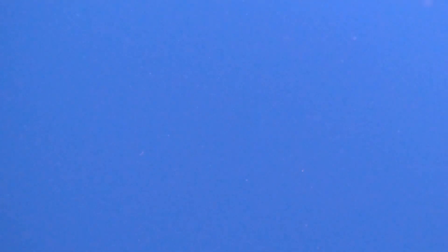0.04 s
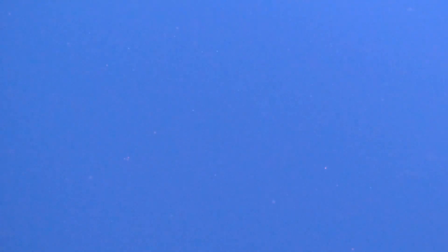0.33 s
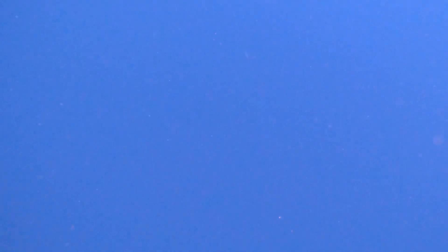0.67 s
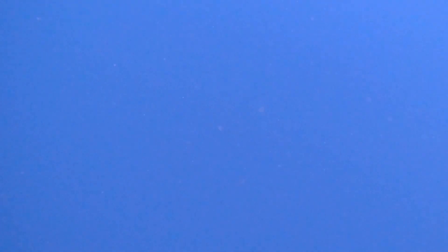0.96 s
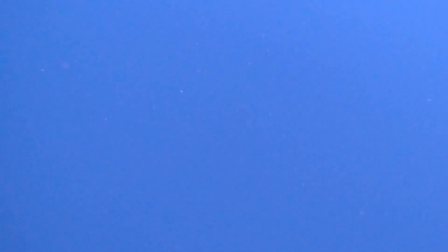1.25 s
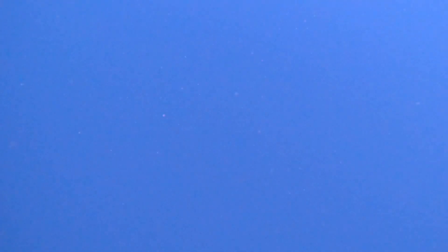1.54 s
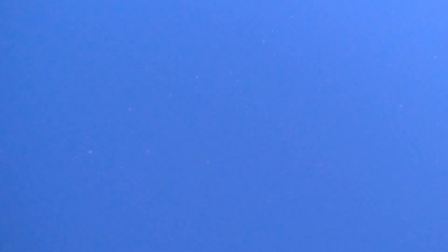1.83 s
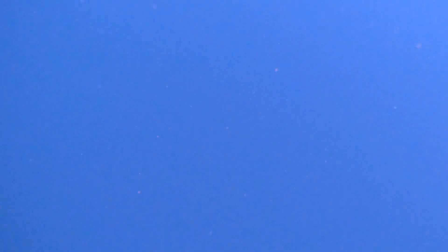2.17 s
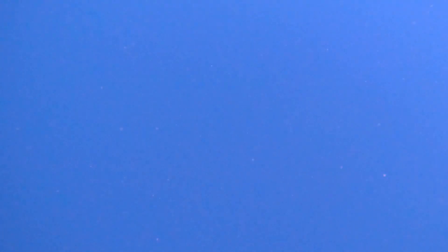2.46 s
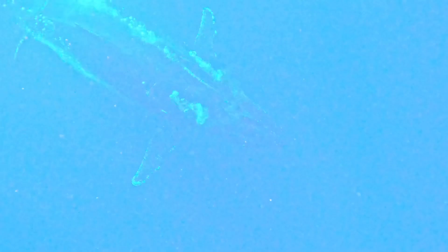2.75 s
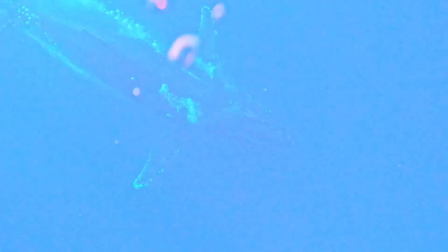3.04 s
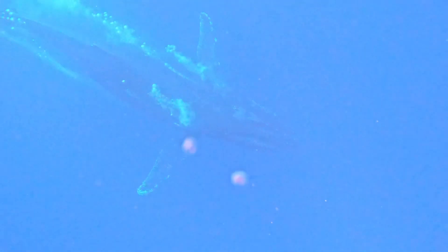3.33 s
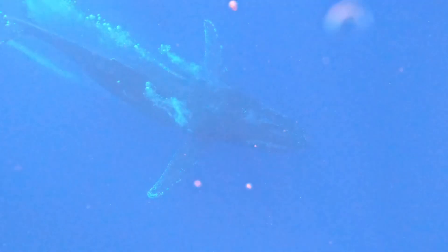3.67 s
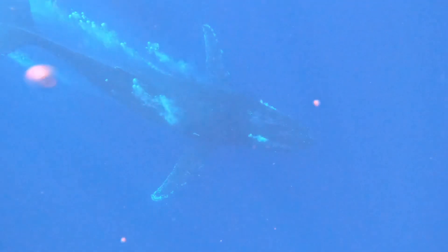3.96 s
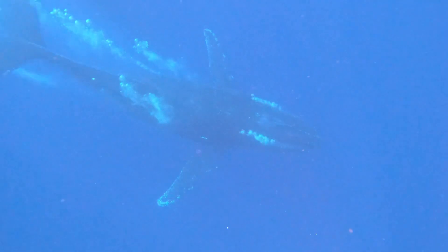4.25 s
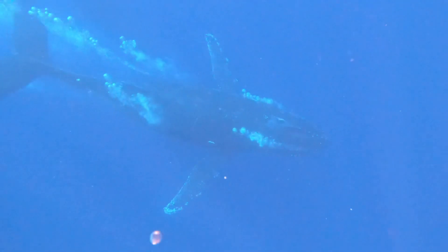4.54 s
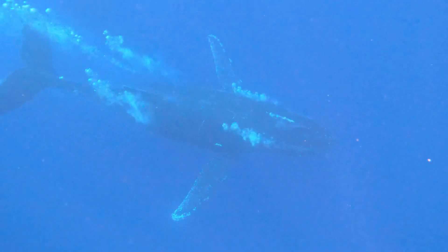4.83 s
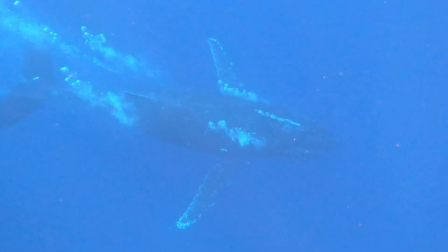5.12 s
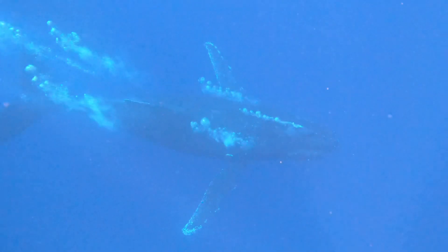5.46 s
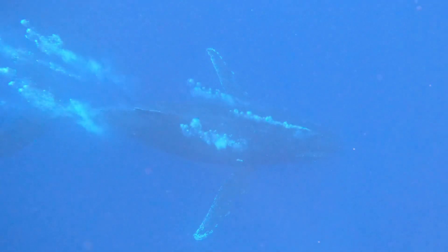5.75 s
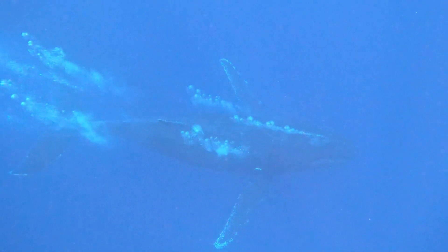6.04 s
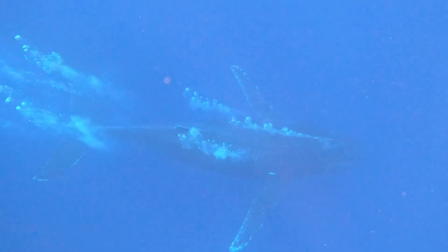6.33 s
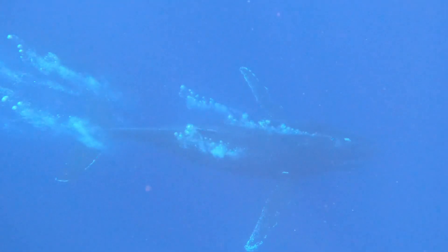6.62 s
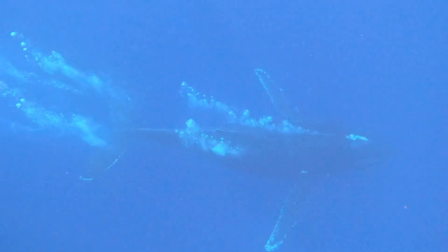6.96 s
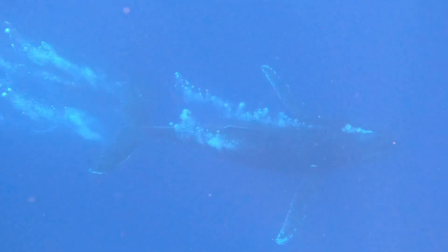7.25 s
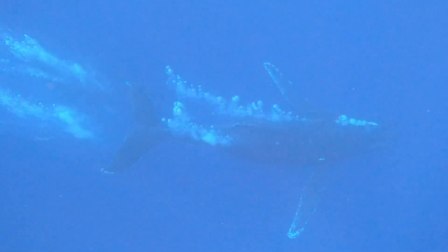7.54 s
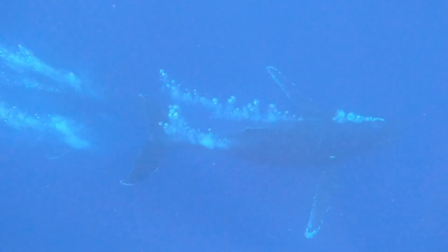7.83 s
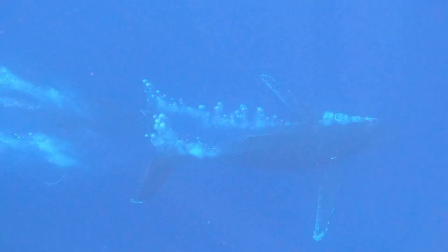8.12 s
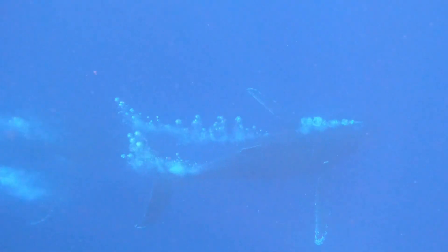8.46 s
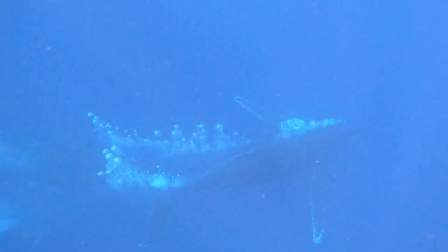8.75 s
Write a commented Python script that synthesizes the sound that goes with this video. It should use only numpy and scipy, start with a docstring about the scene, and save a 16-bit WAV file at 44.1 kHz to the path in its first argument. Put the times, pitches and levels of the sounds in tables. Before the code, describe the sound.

A low underwater rumble runs throughout, with a soft sea hiss at first. In the first 2.3 seconds a few dull bumps hit the camera housing, with a hard tap at 0.7 seconds and a faint high crackle of tiny bubbles just after 1 second. From about 1.4 to 2.6 seconds a whale gives one low, slightly raspy moan that climbs in scoops, holds and sinks. At 2.75 seconds the sound drops out for an instant and the hiss is gone. Small, sharp splashes follow around 3.1 seconds, and water begins churning close by around a swimmer, building until about 6 seconds. Large bubbles gulp and gurgle, and from 5 seconds small ones pinch off with short, high pops. One deep burble swells near 6.2 seconds. The churning continues, with its loudest gulps around 8 seconds, until the end at about 9 seconds.

```python
"""A whale's moan and churning water

In the open sea a whale gives one rising moan, a pulse train shaped by its airways, over a low rumble
and a soft hiss. A few bumps and a tap reach the camera housing. The sound drops out briefly; then
water churns round a swimmer. Each bubble rings as a spring of air loaded by the mass of the water:
a cloud of large ones gurgles, and small ones pinch off with short pops."""
import sys
import numpy as np
from scipy import signal
from scipy.fft import rfft, irfft, next_fast_len
from scipy.io import wavfile
from scipy.ndimage import uniform_filter1d

SR = 44100
rng = np.random.default_rng(int(sys.argv[2]) if len(sys.argv) > 2 else 0)


def transcribe(signal):
    """Save signal, clipped to [-1, 1], as a 16-bit WAV file at the path in sys.argv[1]."""
    frames = np.atleast_2d(signal).T
    limited = np.clip(frames, -1, 1)
    pcm = np.round(limited * 32767).astype(np.int16)
    wavfile.write(sys.argv[1], SR, pcm)


N = 396459
TIME = np.arange(N) / SR
CUT_S, RESUME_S = 2.752, 2.85  # the deepest stretch of the dropout


def amp(db):
    """Decibels to amplitude ratio."""
    return 10 ** (np.asarray(db) / 20)


def unit(x):
    """Normalisation to rms 1."""
    return x / np.sqrt(np.mean(x ** 2) + 1e-20)


def curves(rows):
    """Linear interpolation of each column of a time table, at every sample."""
    s, *columns = np.transpose(rows)
    return [np.interp(TIME, s, c) for c in columns]


def colour(points, hz):
    """Gain of a spectral envelope, interpolated in log frequency."""
    f, db = np.transpose(points)
    return amp(np.interp(np.log(hz + 1), np.log(f + 1), db))


def tint(x, points):
    """Spectral shaping with steep skirts; white noise keeps its power."""
    size = next_fast_len(N)
    hz = np.fft.rfftfreq(size, 1 / SR)
    skirts = np.minimum(1, hz / points[0][0]) ** 2 / np.maximum(1, hz / points[-1][0]) ** 6
    return irfft(rfft(x, size) * unit(colour(points, hz) * skirts), size)[..., :N]


def noise(points):
    """Gaussian noise with the given spectral envelope."""
    return tint(rng.standard_normal(N), points)


def drift(rate_hz):
    """Random modulation: low-passed noise of rms 1."""
    hz = np.fft.rfftfreq(N, 1 / SR)
    return unit(irfft(rfft(rng.standard_normal(N)) * np.exp(-(hz / rate_hz) ** 2), N))


def add(mix, s, sound):
    """Superposition of a sound that starts at time s."""
    part = mix[max(round(s * SR), 0):][:len(sound)]
    part += sound[:len(part)]


def scatter(x, t60):
    """Reverberation: many weak reflections form an exponentially decaying tail."""
    t = np.arange(SR // 2) / SR
    tail = rng.standard_normal(len(t)) * amp(-60 * t / t60)
    return signal.oaconvolve(x, tail / np.linalg.norm(tail))[:N]


# Envelopes of the flow on the housing and of the distant sea: (time [s], relative level [dB])
RUMBLE_ENVELOPE = [(0.0, -33.5), (0.65, -31), (2.7, -38.5), (3.0, -31), (4.4, -24.5), (5.17, -20.5),
                   (5.45, -27), (5.9, -19.5), (6.8, -24), (8.97, -25)]
HISS_ENVELOPE = [(.95, -42), (1.08, -39.5), (2.7, -41.5)]
# Their spectra: (frequency [Hz], relative density [dB])
RUMBLE_SPECTRUM = [(12, 0.5), (27, -4), (42, 2), (55, -12.5), (110, -24.5)]
HISS_SPECTRUM = [(100.0, -11), (300.0, -4), (580.0, -2.5), (700.0, -17), (940.0, -8), (1400.0, -16),
                 (1600.0, -6.5), (2100.0, -21), (3000.0, -26), (3900.0, -36.5), (4800.0, -27.5),
                 (7600.0, -40.5), (11500.0, -57.5)]
def sea(hiss_db=-1.0, rumble_db=-1.0):
    """Ambient noise: flow rumbles on the housing throughout; the far sea hisses until the dropout."""
    rumble = noise(RUMBLE_SPECTRUM)
    rumble /= np.sqrt(uniform_filter1d(rumble ** 2, size=9000) + 1e-6)  # the flow pushes evenly
    rumble *= amp(curves(RUMBLE_ENVELOPE)[0] + rumble_db)
    hiss = noise(HISS_SPECTRUM) * amp(curves(HISS_ENVELOPE)[0] + hiss_db)
    return rumble + hiss * (TIME < CUT_S)


# Soft blows: (centre time [s], envelope peak [dB], frequency [Hz], half width [s])
SOFT_BLOWS = [(0.175, -20, 131, 0.0022), (0.751, -8, 23.7, 0.013), (1.276, -9, 145, 0.006),
              (2.222, -12, 40.2, 0.0065)]
def bumps():
    """Forced motion: a soft blow swings the housing for about a cycle under a Gaussian envelope."""
    out = np.zeros(N)
    t = np.arange(-SR // 12, SR // 12) / SR
    for s, db, hz, half_width in SOFT_BLOWS:
        add(out, s + t[0], -amp(db) * np.exp(-(t / half_width) ** 2) * np.sin(2 * np.pi * hz * t))
    return out


def bubble(hz, cycles, rise, onset):
    """Damped volume oscillation, peak 1: it decays by 1/e in the given cycles as its pitch rises."""
    age = np.arange(int(6 * cycles / hz * SR) + 8) * hz / SR / cycles  # in decay times
    ring = np.sin(2 * np.pi * cycles * (age + rise * (age ** 2 / 2 - age))) * np.exp(-age)
    ring *= 1 - np.exp(-(age / onset) ** 2)
    return ring / abs(ring).max()


# Tiny bubbles: (time [s], relative level [dB], frequency [Hz])
TINY_BUBBLES = [(0.2916, -39, 5490), (1.1, -37, 4740), (1.1175, -35, 4720), (1.1496, -35, 4640),
                (1.219, -37, 5550), (1.2445, -37, 6440), (5.65, -46.5, 6200)]
def pips(gain_db=-3):
    """Resonance frequency varies inversely with radius, so tiny bubbles give a high crackle."""
    out = np.zeros(N)
    for s, db, hz in TINY_BUBBLES:
        add(out, s, amp(db + gain_db) * bubble(hz, cycles=11, rise=.02, onset=.3))
    return out


# Hard blow: (time [s], relative level [dB])
HARD_BLOWS = [(0.728, -9.5)]
# Housing modes: (frequency [Hz], relative level [dB], 60 dB decay time before decay_scale [s])
HOUSING_MODES = [(374, -5.5, 0.24), (880, 10, 0.046), (2930, -4.5, 0.047), (5100, -16.5, 0.07)]
def tap(gain_db=-11.5, decay_scale=0.66, crack_gain=0.8, crack_s=0.0014):
    """Impulse response: a hard tap gives a crack of noise and excites the housing's damped modes."""
    t = np.arange(SR // 8) / SR
    ring = sum(amp(db - 60 * t / (decay_scale * t60)) * np.sin(2 * np.pi * hz * t)
               for hz, db, t60 in HOUSING_MODES)
    crack = noise([(250, 26.0), (1700, 11.5), (3500, -3), (8000, -13.0), (12000, -52)])[:len(t)]
    crack *= t / crack_s * np.exp(1 - t / crack_s)
    strike = ring / abs(ring).max() + crack_gain * crack
    out = np.zeros(N)
    for s, db in HARD_BLOWS:
        add(out, s, amp(db + gain_db) * strike)
    return out


# Tearing air: (frequency [Hz], relative density [dB])
TEAR_SPECTRUM = [(400, -11.5), (1500, 12), (3900, -4), (4700, -23.5), (11000, -50)]
def burst(hz, peak_s, octaves, skirt_db):
    """Transient of tearing air: band noise that swells to rms 1 at peak_s and dies away."""
    age = np.arange(SR // 10) / SR / peak_s
    f = np.fft.rfftfreq(len(age), 1 / SR)
    band = colour(TEAR_SPECTRUM, f) * (amp(skirt_db) + np.exp(-(np.log2((f + 1) / hz) / octaves) ** 2))
    band_noise = irfft(rfft(rng.standard_normal(len(age))) * band, len(age))
    envelope = (age * np.exp(1 - age)) ** 2
    return unit(envelope * band_noise) * np.sqrt(np.mean(envelope ** 2))


# Small bubbles: (time [s], relative level [dB], frequency [Hz], ring against pop [dB])
SMALL_BUBBLES = [(1.196, -28.5, 1780, -6.5), (4.939, -38.5, 2970, 2), (5.005, -34, 2950, -7),
                 (5.08, -37, 3960, -4), (5.146, -41, 2900, 5), (5.213, -37.5, 3270, -6),
                 (5.265, -36.5, 2790, 6.5), (5.342, -34.5, 3030, -8), (5.416, -38, 2700, 4.5),
                 (5.469, -38, 3610, 1), (6.11, -39.5, 2930, 3.5), (6.22, -36, 2530, 0.5),
                 (6.379, -33.5, 2520, -7), (6.442, -34.5, 2560, -2), (6.54, -36, 2660, 10),
                 (6.616, -34, 2690, 1), (6.659, -30.5, 1806, -13), (6.795, -41, 1700, 14),
                 (6.831, -32.5, 1850, 8), (6.968, -33.5, 2740, -12), (7.034, -27.5, 1797, 1),
                 (7.084, -35, 2900, -0.5), (7.144, -31, 3220, -14), (7.206, -32.5, 2470, -7),
                 (7.262, -30.5, 2220, -10), (7.382, -30, 1760, -10), (7.434, -29, 1850, -5),
                 (7.597, -29, 1723, -17), (8.489, -30, 1513, 1), (8.817, -32, 2136, -10.5)]
def pops(gain_db=-3.5, swell_cycles=9):
    """Pinch-off: a small bubble tears free with a pop, then rings at its resonance."""
    out = np.zeros(N)
    for s, db, hz, ring_db in SMALL_BUBBLES:
        add(out, s - 2 / hz, amp(db + gain_db) * burst(hz, swell_cycles / hz, octaves=.38, skirt_db=-11))
        add(out, s, amp(db + gain_db + ring_db) * bubble(hz, cycles=17, rise=.012, onset=.6))
    return out


# Fixed colour of the overtones and of their faint top: (frequency [Hz], relative level [dB])
THROAT_SPECTRUM = [(360, -3.5), (540, -4.5), (760, -14), (945, 1.5), (1030, -2.5), (1350, -3), (1900, -3.5),
                   (2080, -20), (2300, -5), (2520, -17.5), (2900, -14.5), (3250, -30.5)]
THROAT_TOP_SPECTRUM = [(3700, -28.5), (4300, -38), (4850, -26), (5600, -42), (7600, -46.5), (8500, -64)]
# The climbing fourth resonance: (time [s], frequency [Hz])
FOURTH_FORMANT = [(2.05, 3830), (2.3, 4380)]
def airways(on, pitch, phase, formants_hz, opens_s=1.61, shut_db=-9, split_s=2.285, split_width_s=0.16):
    """Formant filtering: overtones slide through resonances; returns three bands, each at rms 1."""
    t = TIME[on]
    first_hz, second_hz, third_hz = formants_hz
    fourth_hz = curves(FOURTH_FORMANT)[0][on]
    # (centre [Hz], half width [Hz], boost [dB])
    formants = [(first_hz, 65, 11), (second_hz, 95, 10), (third_hz, 95, 11), (fourth_hz, 250, 9)]
    # Period doubling: strong and weak pulses alternate, adding lines between the harmonics.
    split = amp(-5) * np.exp(-((t - split_s) / split_width_s) ** 2)
    muffle_db = shut_db * np.clip(10 * (opens_s - t) + .5, 0, 1)  # the call starts muffled
    brighten_db = 20.5 * (t - t.mean())  # the highest overtones gain as it goes on
    knots_s = np.arange(0, N / SR, 1 / 20)
    body, edge, top = np.zeros((3, len(t)))
    for k in [*range(2, 56), *np.arange(4, 16) + .5]:
        hz = k * pitch
        past_body, in_top, airy = np.clip([(hz - 1950) / 250, (hz - 3100) / 300, (hz - 5000) / 1000],
                                          0, 1)
        boost_db = sum(db / (1 + ((hz - centre) / width) ** 2) for centre, width, db in formants)
        boost_db += muffle_db * np.clip((hz - second_hz) / 95, 0, 1) + brighten_db * airy
        # Shifting paths through the water vary each overtone's level and phase, the high ones most.
        swell, slip = (np.interp(t, knots_s, v) * np.minimum(hz / 2000, 1)
                       for v in rng.standard_normal((2, len(knots_s))))
        partial = colour(THROAT_SPECTRUM + THROAT_TOP_SPECTRUM, hz) * amp(boost_db + 3 * swell)
        partial *= np.cos(k * phase + .5 * slip + 2 * np.pi * rng.random()) * (split if k % 1 else 1)
        body += partial * (1 - past_body)
        edge += partial * (past_body - in_top)
        top += partial * in_top
    return [band / np.sqrt(uniform_filter1d(band ** 2, size=3000) + 1e-12) for band in (body, edge, top)]


def open_water(x, near_db=-7, far_db=-10):
    """Multipath propagation: reflections from the surface smear a sound at about constant power."""
    paths = x + amp(near_db) * scatter(x, t60=.09) + amp(far_db) * scatter(x, t60=0.4)
    return paths / np.sqrt(1 + amp(near_db) ** 2 + amp(far_db) ** 2)


# The moan climbs in scoops, holds and sinks: (time [s], fundamental [Hz])
MOAN_PITCH = [(1.32, 146), (1.42, 137), (1.465, 121), (1.52, 119.5), (1.6, 125), (1.69, 144), (1.745, 150),
              (1.8, 145.5), (1.865, 153.6), (1.95, 184), (2.04, 193), (2.08, 175), (2.15, 183),
              (2.275, 185), (2.36, 192.2), (2.415, 192), (2.465, 184), (2.56, 151)]
# Its swell and release: (time [s], fundamental level [dB], overtone body level [dB])
MOAN_EFFORT = [(1.36, -37, -41.5), (1.42, -40.5, -43), (1.49, -26.5, -27), (1.62, -20.5, -27.5),
               (1.85, -19, -20.5), (1.96, -24, -22.5), (2.2, -21.5, -20.5), (2.37, -23.5, -20),
               (2.46, -31, -21.5), (2.6, -42, -41.5)]
# Its timbre: (time [s], first formant [Hz], second formant [Hz], third formant [Hz], roughness [0-1],
# buzzing edge against body [dB], faint top against body [dB])
MOAN_TIMBRE = [(1.54, 955, 1306, 2880, 0.04, -11.5, -22), (1.66, 902, 1795, 2234, 0.39, -7, -25),
               (1.86, 957, 1886, 2320, 0.12, -11.5, -25), (2.02, 948, 1770, 2350, 0.28, -9.5, -23),
               (2.07, 898, 1740, 2350, 0.73, -15.5, -28), (2.18, 1068, 1580, 2700, 0.27, -21.5, -25.5),
               (2.27, 1130, 1557, 2800, 0.041, -23.5, -31), (2.38, 944, 1640, 2530, 0.1, -16.5, -29.5),
               (2.5, 940, 1560, 2640, 0.099, -15, -29.5)]
# Air in the rough stretches: (frequency [Hz], relative density [dB])
RASP_SPECTRUM = [(950, -9), (1750, -2.5), (2100, -15)]
def whale(steady_jitter=.004, rough_jitter=0.035, flutter=0.31, rasp_db=-4, rattle_db=8):
    """Source and filter: gliding pulses drive the airways; roughness adds jitter, flutter and rasp."""
    on = (TIME > MOAN_PITCH[0][0]) & (TIME < MOAN_EFFORT[-1][0] + .03)
    pitch = uniform_filter1d(curves(MOAN_PITCH)[0][on], size=700)
    fundamental_db, body_db = (c[on] for c in curves(MOAN_EFFORT))
    *formants_hz, rough, edge_db, top_db = (c[on] for c in curves(MOAN_TIMBRE))
    jitter = (steady_jitter + rough_jitter * rough) * drift(90)[on]
    phase = 2 * np.pi * np.cumsum(pitch * (1 + jitter)) / SR
    body, edge, top = airways(on, pitch, phase, formants_hz)
    uneven = 1 + rough * flutter * drift(89)[on]
    body += amp(rasp_db) * rough * (1 + np.cos(phase)) * unit(noise(RASP_SPECTRUM))[on]
    top *= amp(top_db + rattle_db * np.sqrt(abs(rough)) * np.tanh(drift(65)[on]))
    fade = signal.windows.tukey(len(pitch), .08)
    fundamental, overtones = np.zeros((2, N))
    overtones[on] = fade * uneven * amp(body_db) * (body + amp(edge_db) * edge + top)
    fundamental[on] = fade * amp(fundamental_db) * np.sqrt(2) * np.sin(phase)
    return fundamental + open_water(overtones)


# The loudest large bubbles: (time near the peak [s], peak level [dB], frequency [Hz])
LARGE_BUBBLES = [(2.541, -26, 459), (3.531, -19, 566), (4.099, -21.5, 588), (4.599, -19.5, 323),
                 (5.04, -16, 550), (5.088, -17.5, 507), (5.796, -15.5, 537), (5.901, -13.5, 558),
                 (6.06, -18, 536), (6.269, -13.5, 566), (6.996, -20, 339), (7.107, -14.5, 507),
                 (7.888, -18, 375.6), (7.944, -15, 524), (8.004, -20.5, 496), (8.065, -11.5, 546),
                 (8.088, -12.5, 530), (8.279, -21, 471), (8.864, -18, 352)]
def gulps():
    """A large air volume is a soft spring: it resonates low, swelling into a gulp."""
    out = np.zeros(N)
    for s, db, hz in LARGE_BUBBLES:
        add(out, s - 6 / hz, amp(db) * bubble(hz, cycles=7.4, rise=0.016, onset=0.4))
    return out


def cloud(low_hz, high_hz, spread_db, per_s=700, sizes=20):
    """Incoherent sum of bubbles of many sizes born at random times; rms 1."""
    out = np.zeros(N)
    for hz in np.geomspace(low_hz, high_hz, sizes):
        when, strength, polarity = rng.random((1500, 3))[:int(per_s * N / SR / sizes)].T
        gain = amp(spread_db * np.minimum(-np.log(strength), 4)) * np.sign(polarity - .5)
        births = np.bincount((when * N).astype(int), gain, N)
        out += signal.oaconvolve(births, bubble(hz, cycles=5.5, rise=0.039, onset=0.45))[:N]
    return unit(out)


def clumps(x, depth_db, rate_hz=9):
    """Band-wise modulation: like-sized bubbles come in crowds, so each band swells on its own."""
    _, frame_s, spectra = signal.stft(x, SR, nperseg=1024, noverlap=768)
    frames = max(round(1 / (rate_hz * frame_s[1])), 1)
    swell = uniform_filter1d(rng.standard_normal(spectra.shape), size=4, axis=0)
    swell = unit(uniform_filter1d(swell, size=frames, axis=1))
    return signal.istft(spectra * amp(depth_db * swell), SR, nperseg=1024, noverlap=768)[1][:N]


# How hard the water is stirred: (time [s], relative level [dB])
STIRRING = [(2.9, -36.5), (3.3, -31.5), (4.85, -25), (5.1, -22), (5.55, -19.5), (5.9, -19), (6.451, -22),
            (7.1, -19), (7.95, -19.5), (8.97, -21)]
# Clouds of large and of fine bubbles: (frequency [Hz], relative density [dB])
GURGLE_SPECTRUM = [(120.0, 5), (180.0, -16.5), (270.0, -8), (440.0, -1), (530.0, 3.5), (660.0, -2.5),
                   (780.0, -6), (1000.0, -24.5)]
SPRAY_SPECTRUM = [(950.0, -9), (1100.0, -13), (1650.0, -6.5), (2100.0, -21), (2700.0, -18), (3500.0, -26),
                  (4000.0, -22.5), (5200.0, -27.5), (8500.0, -44)]
def churn(gurgle_db=-5.5, spray_db=-46, spray_follows=0.54, flicker_db=1.53):
    """Bubble-cloud noise: large and fine bubbles in a wash surge together as the water is stirred."""
    stir_db = curves(STIRRING)[0]
    fine_db = spray_db + spray_follows * (stir_db - stir_db.max())
    surge_db = flicker_db * drift(51)
    large = cloud(174, 1023, spread_db=1.2) + 1.33 * rng.standard_normal(N)
    gurgle = clumps(unit(tint(large, GURGLE_SPECTRUM)), depth_db=2.0)
    fine = 0.58 * cloud(930, 7000, spread_db=3) + rng.standard_normal(N)
    spray = unit(tint(fine, SPRAY_SPECTRUM))
    return gurgle * amp(stir_db + gurgle_db + surge_db) + spray * amp(fine_db + surge_db)


# Air splashing past the housing: (time [s], relative level [dB], frequency [Hz])
AIR_SPLASHES = [(3.07, -21.5, 1930), (3.083, -23, 2270), (3.094, -27.5, 3280), (3.13, -24.5, 1860),
                (3.175, -29.5, 3500), (3.333, -29.5, 1460)]
def splashes(gain_db=-4.0):
    """Transient and free oscillation: air tears with a noise burst, then chirps upward as a bubble."""
    out = np.zeros(N)
    for s, db, hz in AIR_SPLASHES:
        add(out, s, amp(db + gain_db) * burst(hz, peak_s=0.0036, octaves=0.22, skirt_db=-6.0))
        add(out, s, amp(db + gain_db - 7) * bubble(hz, cycles=26, rise=.09, onset=.5))
    return out


# Crowds of middling bubbles: (start [s], end [s], greatest bubble level [dB], centre frequency [Hz])
BUBBLE_CROWDS = [(3.961, 4.064, -40, 1287), (5.757, 5.929, -33.5, 1004), (6.035, 6.083, -27.5, 1124),
                 (6.259, 6.328, -28.5, 1420), (7.766, 7.843, -28.5, 1084)]
def flurries(per_s=120, octaves=0.87, spread_db=10):
    """Superposition: middling bubbles break loose so thickly that their short rings overlap."""
    out = np.zeros(N)
    for start, end, db, centre_hz in BUBBLE_CROWDS:
        for when, pitch, weakness in rng.random((60, 3))[:round(per_s * (end - start))]:
            ring = bubble(centre_hz * 2 ** (octaves * (pitch - .5)), cycles=6.5, rise=.012, onset=.3)
            add(out, start + when * (end - start), amp(db - spread_db * weakness) * ring)
    return out


# One deep burble: (time [s], relative level [dB])
BURBLE_ENVELOPE = [(5.95, -81), (6.04, -36), (6.18, -20.5), (6.3, -65)]
# Its spectrum: (frequency [Hz], relative density [dB])
BURBLE_SPECTRUM = [(110, 7.5), (170, -14), (250, -16.5)]
def burble(gain_db=2.0):
    """Amplitude-modulated low noise: the stirred water gives one deep swell."""
    return noise(BURBLE_SPECTRUM) * amp(curves(BURBLE_ENVELOPE)[0] + gain_db)


# The housing's two microphones: (frequency [Hz], left minus right [dB], left phase lead [rad])
MICROPHONE_BALANCE = [(200, -4.5, -0.06), (500, 4.5, 0.06), (620, 10, 1), (700, 1, -1.5), (950, -1.5, -1),
                      (1230, -8, -1.5), (1474, 2.5, 2), (1650, 5, 1.4), (2800, -0.5, 0.85)]
def microphones(x):
    """Level and phase differences: the housing colours each side until the dropout; then both match."""
    size = next_fast_len(N)
    hz, balance_db, lead = np.transpose(MICROPHONE_BALANCE)
    bins = np.fft.rfftfreq(size, 1 / SR)
    gain = amp(np.interp(bins, hz, balance_db, left=0))
    ratio = gain * np.exp(1j * np.interp(bins, hz, lead, left=0))
    side = irfft(rfft(x, size) * (ratio - 1) / (ratio + 1), size)[:N] * (TIME < CUT_S)
    return np.array([x + side, x - side])


def scene(wet_db=-10):
    """Superposition of all sources at the two microphones; near bubbles carry a short reverberation."""
    moan, ambience = whale(), sea()
    stirred = (churn() + burble()) * (TIME > RESUME_S)
    near = pops() + gulps() + splashes() + pips() + flurries()
    near += amp(wet_db) * scatter(near, t60=0.18)
    return microphones(moan + ambience + stirred + near + bumps() + tap())


# The dropout: (time [s], gain [dB])
DROPOUT_GAIN = [(2.744, 0), (2.752, -65), (2.85, -60), (2.885, -20), (2.915, 0)]
def record(dry, cutoff_hz=12000):
    """Attenuation and band limiting: the sound drops out briefly, and a low-pass trims the treble."""
    cut = dry * amp(curves(DROPOUT_GAIN)[0])
    low_pass = signal.firwin(255, cutoff_hz, window=("kaiser", 9), fs=SR)
    return signal.oaconvolve(cut, low_pass[None], "same")


dry = scene()
out = record(dry)
transcribe(out)
```